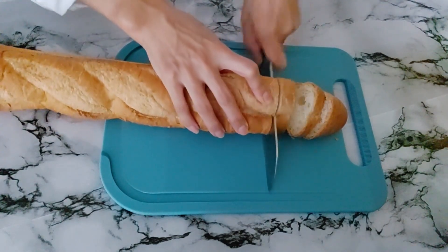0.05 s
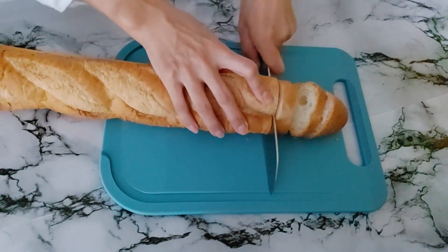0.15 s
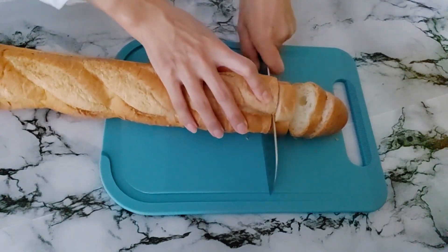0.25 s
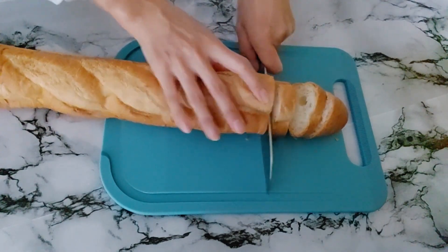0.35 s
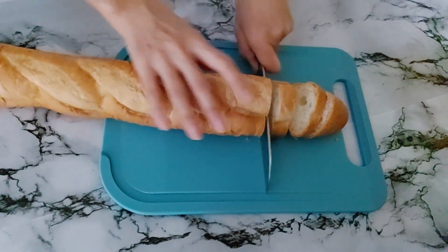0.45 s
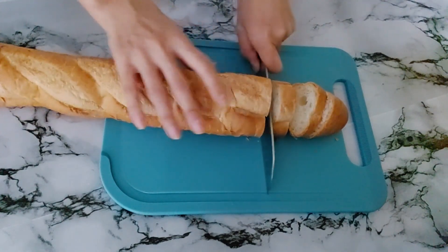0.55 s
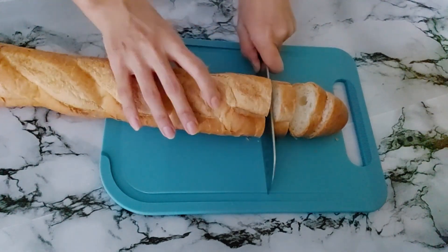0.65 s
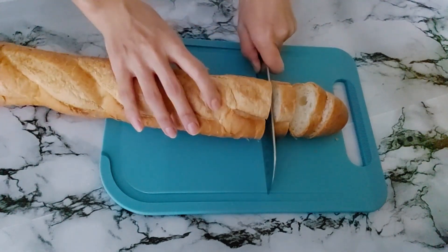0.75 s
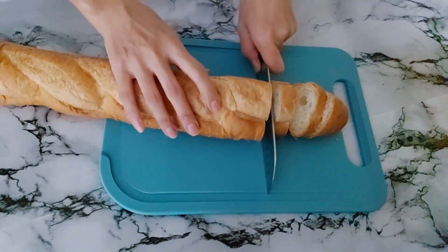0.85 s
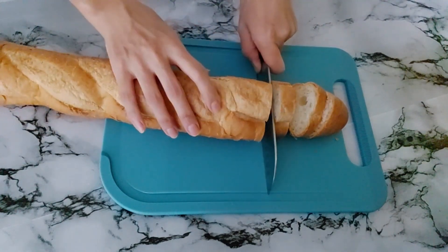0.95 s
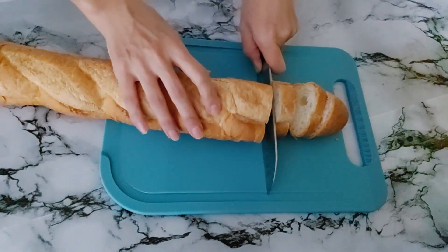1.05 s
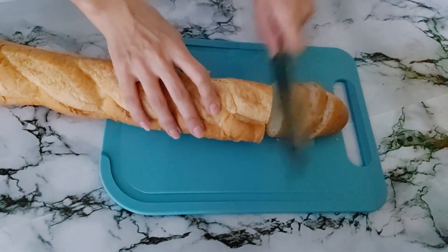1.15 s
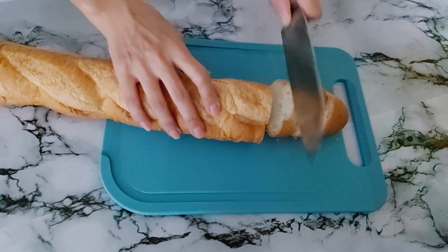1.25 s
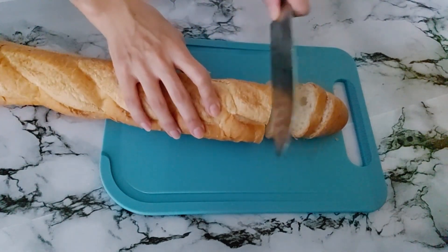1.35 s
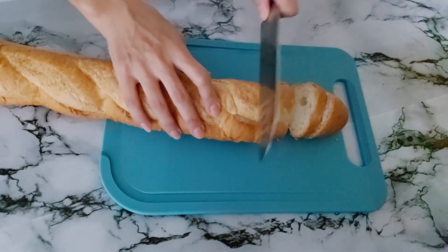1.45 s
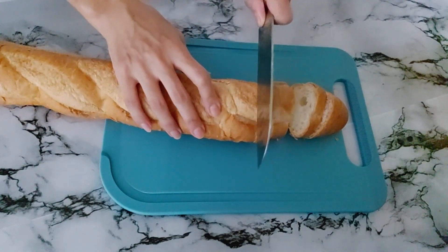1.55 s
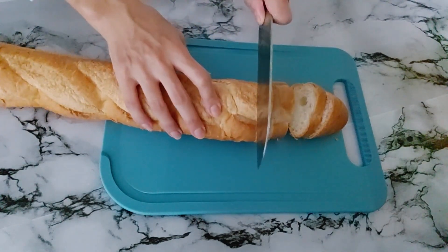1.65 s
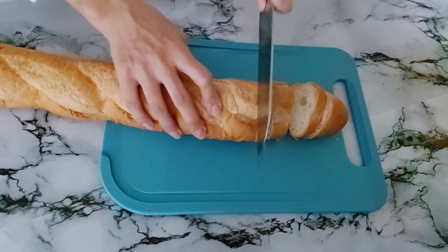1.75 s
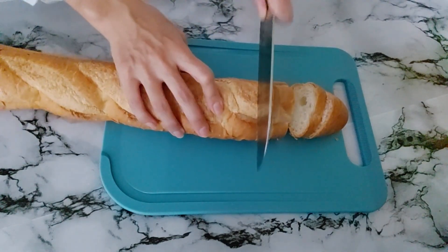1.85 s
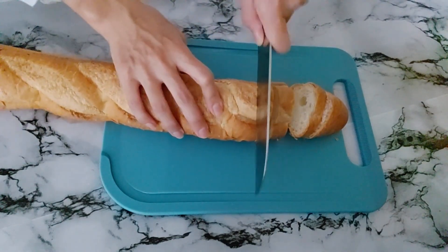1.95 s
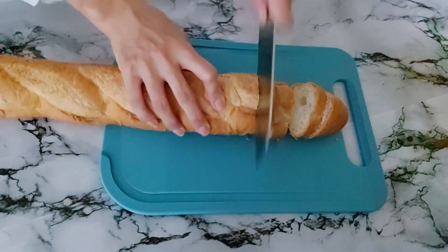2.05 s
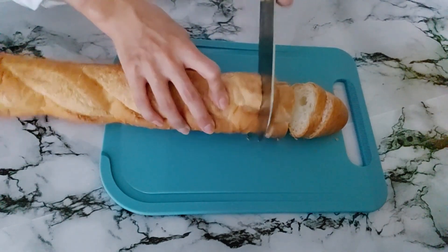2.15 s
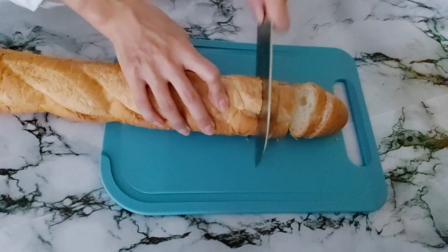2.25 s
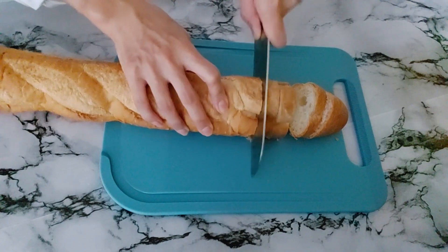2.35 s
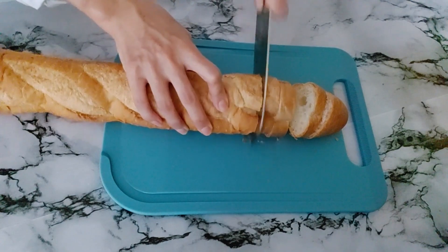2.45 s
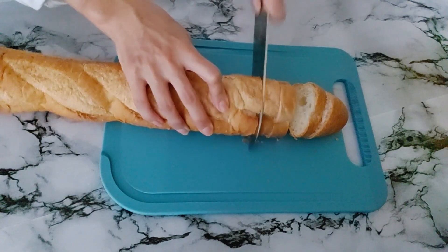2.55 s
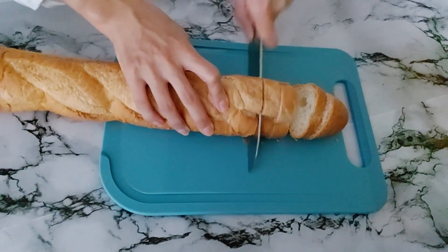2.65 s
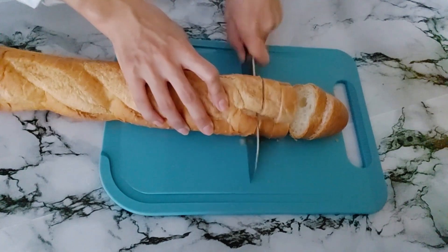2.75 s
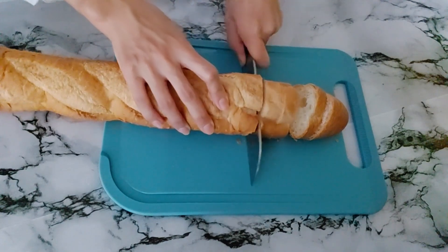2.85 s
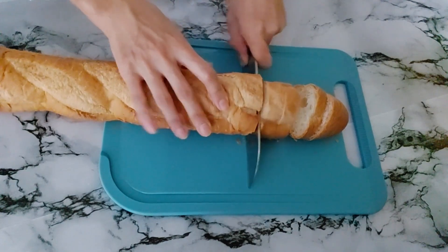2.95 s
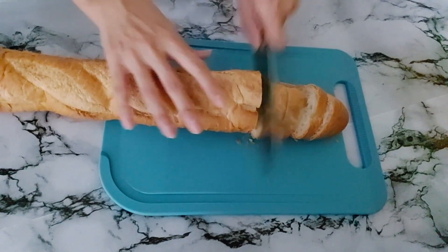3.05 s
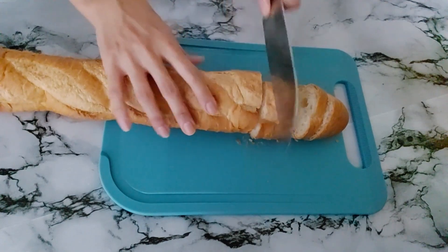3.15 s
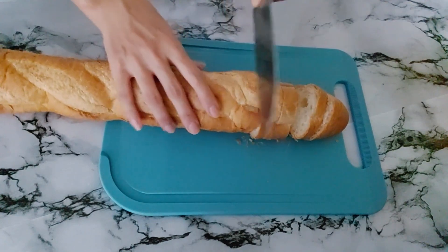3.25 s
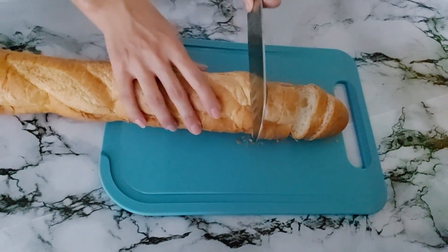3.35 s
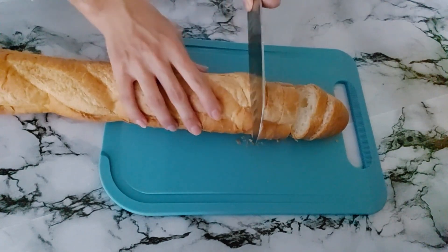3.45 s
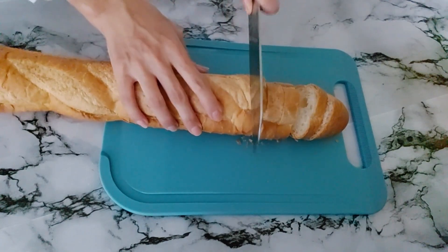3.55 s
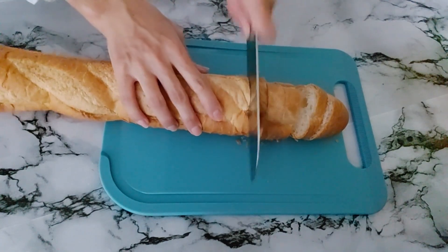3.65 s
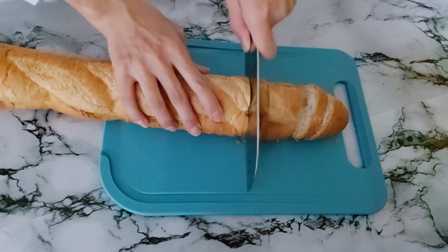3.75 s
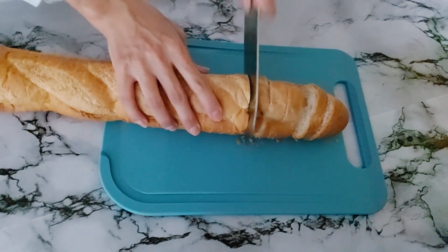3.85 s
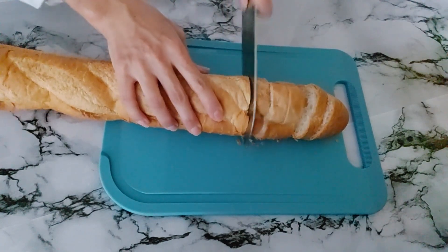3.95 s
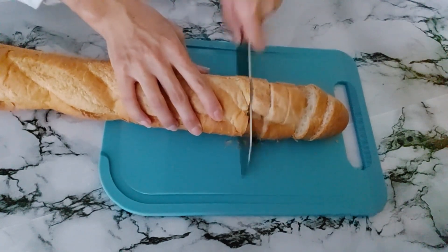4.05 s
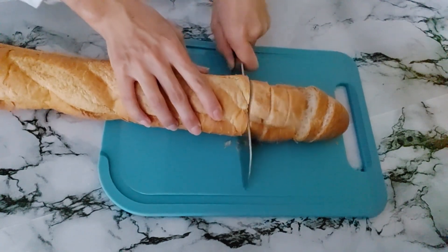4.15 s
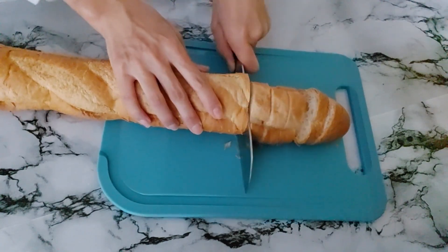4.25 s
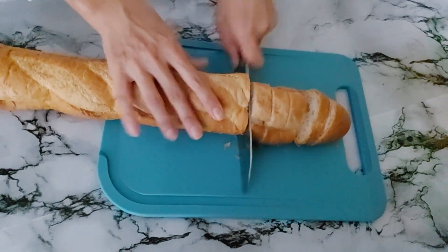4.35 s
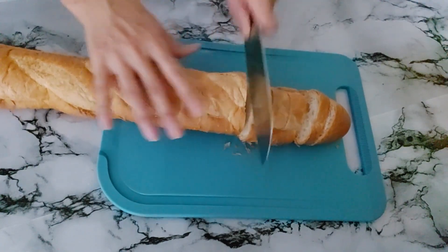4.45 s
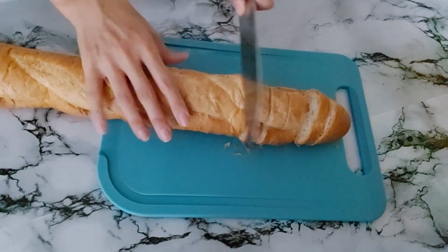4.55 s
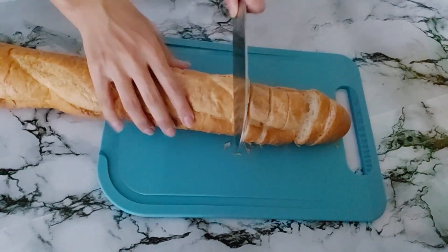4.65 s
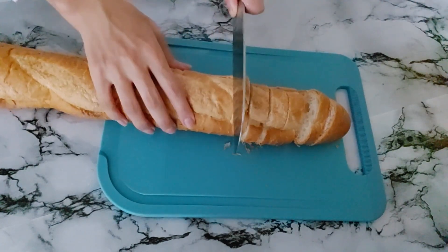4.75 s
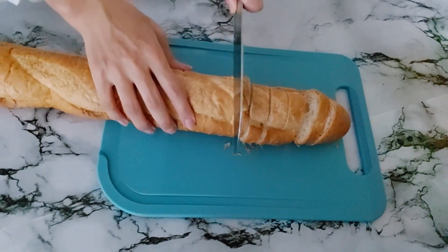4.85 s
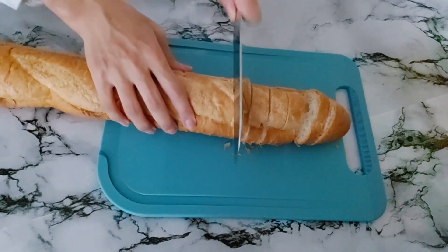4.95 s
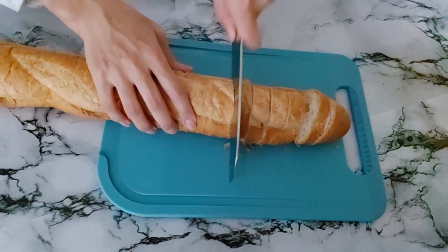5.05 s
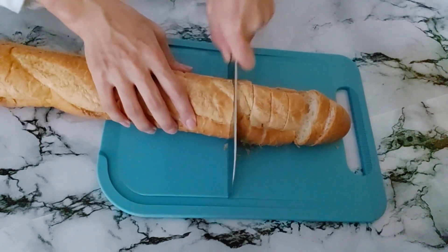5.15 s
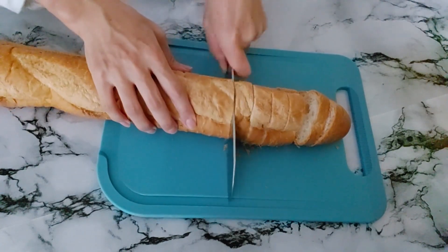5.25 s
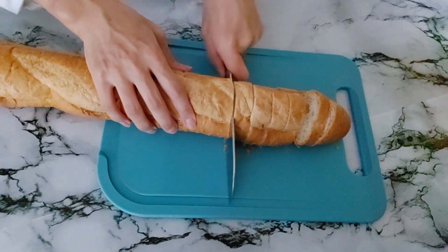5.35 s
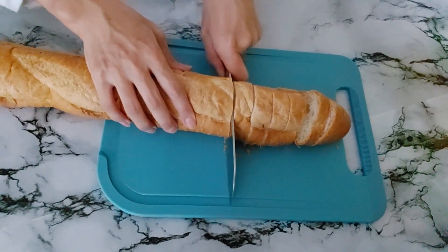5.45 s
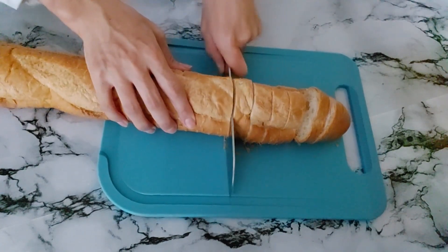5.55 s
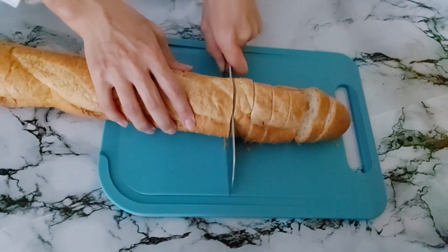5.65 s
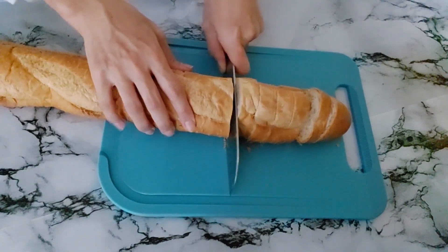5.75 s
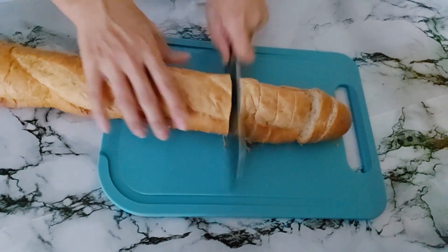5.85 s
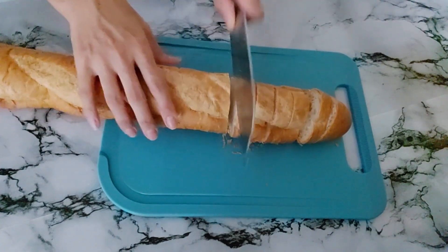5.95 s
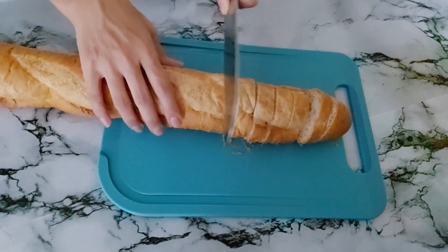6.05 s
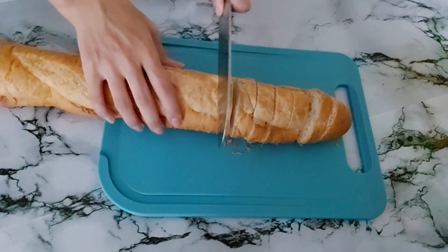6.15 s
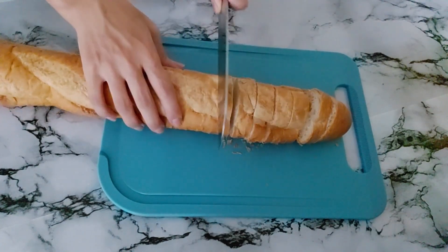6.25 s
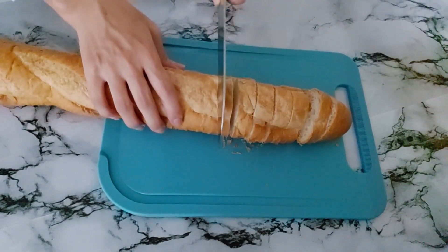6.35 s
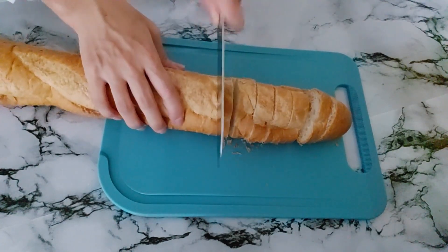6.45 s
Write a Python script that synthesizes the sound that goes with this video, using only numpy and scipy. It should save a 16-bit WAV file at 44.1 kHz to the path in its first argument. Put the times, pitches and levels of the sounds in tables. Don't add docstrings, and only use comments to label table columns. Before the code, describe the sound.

A knife saws crisp slices off a stale baguette on a plastic board, with crackling crust, sharp hollow snaps and low counter thumps in a quiet kitchen.

```python
import sys
import numpy as np
from scipy import signal
from scipy.io import wavfile
from scipy.ndimage import uniform_filter1d

SR = 44100
rng = np.random.default_rng(int(sys.argv[2]) if len(sys.argv) > 2 else 0)


def gain_from_decibels(decibels):
    exponent = np.asarray(decibels, float) / 20
    return 10 ** exponent


def unload_wav(signal):
    wavfile.write(
        sys.argv[1],
        SR,
        np.round(np.clip(np.atleast_2d(signal).T, -1, 1) * 32767).astype(np.int16),
    )


N = 287091

# frequency in Hz, level in dB per Hz.
AIR = [(18, -52), (30, -27.5), (75, -18), (88, -9), (140, -2), (169, -9), (250, -2.5), (333, -32),
       (370, -8), (1370, -31.5), (2190, -27), (5050, -52.5), (5470, -29.5), (15600, -35)]
AIR_DB = -67.5
# frequency in Hz, likeness from -1 to 1.
PORT_LIKENESS = [(60, 0.7), (240, 0.25), (950, 0.2), (3770, -0.3), (15000, -0.048)]
# frequency in Hz, width in Hz, level in dB.
FAN_HUM = [(101, 14, -78.5), (208, 16, -81.5), (259, 24, -73.5), (5370, 45, -100)]
# frequency in Hz, t60 in seconds.
KITCHEN_DECAY = [(200, 0.13), (1000, 0.042), (4000, 0.077), (12000, 0.13)]
KITCHEN_DB = -6.5

# start in seconds, length in seconds, pitch in Hz, level in dB.
SINGING = [
    (1.22, 0.098, 10300, -91.5),
    (2.929, 0.23, 2820, -73.5),
    (3.369, 0.056, 4400, -95),
    (4.491, 0.1, 4800, -79),
    (5.824, 0.11, 3350, -76.5),
    (5.936, 0.077, 3990, -71.5),
    (5.461, 0.014, 3350, -52),
    (5.924, 0.051, 6980, -72),
    (5.928, 0.083, 10300, -77),
    (6.355, 0.15, 3450, -76.5),
]
# start in seconds, level in dB, pitch in Hz, t60 in seconds.
THUMPS = [(0.184, -33.5, 82, 0.16), (1.652, -51.5, 61.6, 0.13), (2.685, -44, 61.7, 0.14),
          (2.847, -42, 61, 0.4), (3.454, -52.5, 59.6, 0.17), (3.729, -41, 63.6, 0.23),
          (4.105, -38, 63.4, .2), (5.129, -35, 63, 0.19), (4.239, -26.5, 59.7, 0.27),
          (4.522, -53.5, 130, 0.28), (4.525, -52.5, 55.4, .25), (4.77, -49.5, 79, 0.149),
          (5.48, -31.5, 66, 0.2), (5.968, -47, 61.5, 0.35), (5.999, -36, 144, 0.1),
          (6.259, -50.5, 59.21, 0.2)]

# frequency in Hz, level in dB, t60 in seconds.
LOAF_MODES = [(530.8, 12.5, 0.083), (705, -1, 0.26), (780, 0.5, 0.15), (934, 14, 0.061), (1100, -11, 0.02),
              (1533, -5.5, 0.0092), (1733, 10, 0.079), (1880, -18, 0.054), (1960, -3.5, 0.01),
              (2200, -17.5, 0.039), (2540, -12, 0.04), (2880, -15.5, .04), (3400, -22, 0.043)]
# frequency in Hz, level in dB, t60 in seconds.
BOARD_MODES = [(130, -9.5, 0.19), (220, -12, 0.035), (239.8, 2.5, 0.14), (259.5, -1.5, 0.13)]
# start in seconds, peak in dB, crack pitch in Hz,
# board knock in dB, bright tick in dB.
CRACKS = [(0.0, -31, 700, -35.5, -62), (1.23, -81, 3020, -85, -59), (1.468, -84, 3000, -85.5, -62),
          (5.949, -72, 3300, -69, -58), (0.1734, -20.5, 900, -53.5, -53.5), (1.7673, -57, 780, -79, -61.5),
          (2.031, -35.5, 1250, -69, -67.5), (2.304, -41, 1000, -47, -53.5), (2.666, -7, 977, -28, -51.5),
          (3.437, -54, 786, -58.5, -64), (3.713, -27.5, 860, -37.5, -44), (4.039, -60, 1100, -72, -53),
          (4.091, -3.5, 1530, -27.5, -54), (4.2259, -9, 931, -39.5, -46), (4.382, -59, 515, -61, -51),
          (4.48, -62, 3020, -68, -41), (5.013, -47, 560, -49.5, -51), (5.19, -15.5, 1600, -32.5, -66.5),
          (5.391, -18, 607, -40.5, -33.5), (5.825, -67.5, 3360, -65.5, -49.5),
          (5.933, -75, 3290, -82, -61.5), (6.083, -46.5, 500, -49.5, -59)]
# start in seconds, peak in dB, pitch in Hz,
# board knock in dB, hollow note in dB.
TAPS = [(1.164, -63, 780, -54.5, 13.5), (1.6308, -47.5, 920, -60, -23), (2.84, -26.5, 705, -44.5, -13),
        (3.107, -53.5, 1435, -68, 2.5), (3.259, -61, 786, -86, -7.5), (4.402, -44, 720, -52.5, -5),
        (4.412, -46, 780, -59, -22), (4.435, -43.5, 768, -70, -2), (4.6481, -49, 600, -55.5, -21),
        (4.7533, -45, 680, -49.5, -17.5), (5.468, -16.5, 950, -37.5, -38), (4.521, -59, 420, -52, -20),
        (5.568, -48, 743, -70, -22), (5.888, -56.5, 793, -66.5, 3), (5.967, -49, 750, -43.5, -3),
        (5.985, -45.5, 553, -48.5, -9.5), (6.242, -60.5, 531, -59, -8.5)]
CRACK_NOTE_DB, TAP_TICK_DB, TAP_TICK_SHARE = -23, -70, 0.1
CRACK_SLIDE_HZ, TAP_SLIDE_HZ = 2800, 490
PORT_LAG = 5
BLADE_LAGS = (1, 3, 5, 9)

# start in seconds, hold in seconds, pressure in dB,
# pressure drift over the hold in dB, blade speed in dB.
STROKES = [(1.93, .1, -58.5, 8, -9), (2.13, 0.06, -52, 1.1, -3.5), (2.3, 0.096, -42, 0, -7.5),
           (2.5, 0.054, -54.5, -3.5, 7), (3.88, 0.065, -47.5, -2, -4.5), (5.065, 0.12, -40, 5, -16.5),
           (5.17, .1, -36.5, -1.5, -11.5), (5.4, 0.0072, -45.5, -6, -4), (5.463, 0.043, -39.5, -9, -23),
           (5.6, 0.036, -56.5, -1, -11.5), (6.46, .05, -69, 17, -9)]
# start in seconds, hold in seconds, pressure in dB,
# drift in dB, speed in dB.
RUBS = [(0.25, .06, -68, -11.5, -8.5), (0.36, .04, -88, -8, -3), (0.42, 0.049, -68, -5.5, -17.5),
        (1.46, 0.023, -86, -8, -4), (2.92, 0.16, -69.5, 5, -10), (3.2, 0.16, -84.5, 7, -18),
        (3.64, 0.12, -68, 15, -11.5), (4.0, 0.018, -64.5, -4, -5.5), (2.24, .03, -50, 0, -23.5),
        (2.46, 0.015, -56.5, 3.5, -13), (4.39, 0.023, -63, 5.5, -13.5), (4.53, 0.036, -68.5, -12, -9),
        (5.77, 0.14, -82.5, 8, -2.5), (5.94, 0.061, -75, -3, -1.3), (6.33, 0.061, -77, -0.5, -19)]
# start in seconds, hold in seconds,
# pressure in dB, drift in dB, speed in dB.
BITES = [(1.168, 0.022, -66, -0.5, -14), (1.633, .02, -65, 4, -20.5), (1.77, .065, -65, 1.5, -6),
         (3.44, .03, -78, 3.5, -13.5), (3.716, 0.1, -37, -3.5, -15), (4.385, .01, -70, -2.5, -1),
         (4.484, 0.014, -69, -1, 6.5), (4.652, .02, -61, -4, -26), (4.756, 0.033, -60, -1.5, -26),
         (5.014, .03, -66, -1, -18.5), (5.826, .012, -83.5, 0, 7.5), (5.95, 0.014, -74, 0, 6),
         (6.086, 0.037, -55, -6.5, -33), (6.244, 0.0142, -73, -3.5, -14)]
# start in seconds, hold in seconds,
# pressure in dB, drift in dB, speed in dB.
FINISHES = [
    (0.0, .17, -43.5, 0, -6.5),
    (2.66, 0.17, -35, -11.5, -6.5),
    (4.075, .03, -32, -1.5, -10.5),
    (4.12, 0.12, -38.5, -3.5, -9.5),
    (4.27, .07, -51, -13.5, -16),
    (5.29, 0.088, -43, -9.5, -12),
]
STROKE_RISE, STROKE_FALL, STROKE_CRISP_DB = 380, 276, 0.5
RUB_RISE, RUB_FALL, RUB_CRISP_DB = 240, 92, -3
BITE_RISE, BITE_FALL, BITE_CRISP_DB = 1600, 610, 0
FINISH_RISE, FINISH_FALL, FINISH_CRISP_DB = 477, 340, 4.5
RASP_DRIFT, RASP_EDGE = 0.87, 0.98
REST_DB = [
    [-99],
    [-108],
]

# frequency in Hz, level in dB per Hz.
CRUST = [(150, -35), (300, -4.5), (500, 1), (1000, -1.5), (1700, -3.5), (2300, -4.5), (3300, -8.5),
         (4500, -20), (8000, -33), (16000, -56.5)]
# frequency in Hz, level in dB per Hz.
RASP = [(1500, -20), (3000, -3.5), (4500, -2), (6000, -4.5), (8000, -8), (10000, -9), (12500, -3),
        (15500, -11)]
CRISP_SHARE, CRISP_DB = 0.87, 8
PATCH_DB = 2.2
BOARD_SHARE, BOARD_DB = 0.61, -26
COUNTER_SHARE, COUNTER_DB, COUNTER_LATE_S = 0.82, -22.5, 0.06
RASP_REST_DB, COUNTER_REST_DB, COUNTER_TOP_DB = -91, -80, -50


def evened(x):
    return x / np.sqrt(np.mean(x ** 2) + 1e-20)


def read(points, hz):
    f, value = np.transpose(points)
    return np.interp(np.log(hz + 1), np.log(f + 1), value)


def add(mix, start_s, sound):
    part = mix[..., round(start_s * SR):][..., :sound.shape[-1]]
    part += sound[..., :part.shape[-1]]


def coloured(x, points):
    shape_db = np.maximum(read(points, abs(np.fft.fftfreq(4096, 1 / SR))), -100)
    log_gain = np.log(gain_from_decibels(shape_db))
    taps = np.fft.ifft(np.exp(np.conj(signal.hilbert(log_gain)))).real[:2048]
    return signal.oaconvolve(np.atleast_2d(x), taps[None], axes=1)[:, :x.shape[-1]]


def band(x, lo_hz, hi_hz):
    return signal.sosfilt(signal.butter(2, [lo_hz, hi_hz], "band", fs=SR, output="sos"), x)


def highpass(x, order, hz):
    return signal.sosfilt(signal.butter(order, hz, "high", fs=SR, output="sos"), x)


def band_rms(x, lo_hz, hi_hz):
    return x / np.std(band(x, lo_hz, hi_hz))


def whistle(hz, width_hz, count):
    r = np.exp(-np.pi * width_hz / SR)
    noise = [1, 1j] @ rng.standard_normal((2, count + 4000))
    slow = signal.lfilter([1], [1, -2 * r, r * r], noise)[4000:]
    return evened((slow * np.exp(2j * np.pi * hz * np.arange(count) / SR)).real)


def ring(modes, signs, damping=0.92, rise_s=0.00027):
    t = np.arange(SR // 6) / SR
    tones = 0
    for (hz, db, t60), sign in zip(modes, signs):
        tones = tones + sign * gain_from_decibels(db - 60 * damping * t / t60) * np.sin(2 * np.pi * hz * t)
    return tones * (1 - np.exp(-t / rise_s)) ** 2


def air():
    hz = np.fft.rfftfreq(2048, 1 / SR)
    a, b, c, d, patches = rng.standard_normal((N // 512 + 5, 1025, 5)).T
    patches = evened(uniform_filter1d(uniform_filter1d(patches, 12, 0), 8, 1))
    same = np.clip(read(PORT_LIKENESS, hz), -1, 1)[:, None]
    left = a + 1j * b
    right = same * left + np.sqrt(1 - same ** 2) * (c + 1j * d)
    z = np.array([left, right]) * gain_from_decibels(read(AIR, hz)[:, None] + 0.69 * patches)
    tone = signal.istft(z, nperseg=2048, noverlap=1536)[1][:, :N]
    hum = sum(gain_from_decibels(db) * whistle(f, width, N) for f, width, db in FAN_HUM)
    return gain_from_decibels(AIR_DB - 4.5) * evened(tone) + hum


def kitchen(x):
    taps = np.zeros((2, SR // 2))
    at = np.arange(60, SR // 2 - 20, 20)
    at = at + rng.integers(0, 20, (2, len(at)))
    np.put_along_axis(taps, at, rng.choice([-1., 1.], at.shape), 1)
    hz, t, z = signal.stft(taps, SR, nperseg=256)
    decay = gain_from_decibels(-60 * t / read(KITCHEN_DECAY, hz)[:, None])
    tail = signal.istft(z * decay, SR, nperseg=256)[1]
    return signal.fftconvolve(x[None], tail / np.linalg.norm(tail[0]), axes=1)[:, :N]


def add_singing(mix):
    for start_s, length_s, hz, db in SINGING:
        count = round(length_s * SR)
        add(mix, start_s, gain_from_decibels(db) * whistle(hz, 250, count) * signal.windows.tukey(count, 0.6))


def add_thumps(mix):
    t = np.arange(SR // 3) / SR
    for start_s, db, hz, t60 in THUMPS:
        tone = np.sin(2 * np.pi * hz * t) * (1 - np.exp(-t / 0.002))
        add(mix, start_s, gain_from_decibels(db - 60 * t / t60) * tone)


def snap(peak_db, hz, knock_db, tick_db, note_db, top_hz, chance):
    t = np.arange(SR // 6) / SR
    hard = np.clip((peak_db + 51) / 30, 0.1, 1)
    slide_hz = top_hz * hard
    turns = min(hz, 950) * t + slide_hz * 0.00053 * (1 - np.exp(-t / 0.00057))
    crack = -np.sin(2 * np.pi * turns) * np.exp(-t / 0.0009) * (1 - np.exp(-t / 0.00004)) ** 2
    crack = crack + 0.3 * np.roll(crack, round(0.0009 * SR))
    splinters = np.sin(2 * np.pi * 4300 * t) * np.exp(-t / 0.0005)
    crack = crack - 0.45 * top_hz / CRACK_SLIDE_HZ * splinters
    crack = crack / abs(crack).max()

    crumble = evened(band(band(rng.standard_normal(len(t)), 0.26 * hz, 3.5 * hz), 300, 4000))
    crumble = (0.17 - 0.09 * hard) * crumble * np.exp(-t / 0.011) * (1 - np.exp(-t / 0.002))
    note = np.sin(2 * np.pi * hz * t) * np.exp(-t / 0.014) * (1 - np.exp(-t / 0.00033))
    near = [(f, db - 5 * abs(np.log2(f / hz)), t60) for f, db, t60 in LOAF_MODES]
    body = crack + gain_from_decibels(note_db) * note * (hz < 1200) + crumble
    body = body + 0.16 * ring(near, chance[:len(LOAF_MODES)], damping=1.7, rise_s=0.0006)
    body = body + 0.1 * np.roll(body, round(0.0056 * SR))

    knock = ring(BOARD_MODES, chance[-4:] * 0.33 + 1, rise_s=0.0053)
    tick = band(rng.standard_normal((2, len(t))), 2700, 13000)
    tick = tick * (np.exp(-t / 0.0022) + 0.12 * np.exp(-t / 0.02))
    pair = gain_from_decibels(peak_db + np.array([[1.5], [-1.5]])) * body + gain_from_decibels(knock_db + 3) * knock
    pair[1] = np.roll(pair[1], PORT_LAG)
    return pair + gain_from_decibels(tick_db - 4.5) * tick


def add_blows(mix):
    blows = [(*row, CRACK_NOTE_DB, CRACK_SLIDE_HZ) for row in CRACKS]
    for start_s, db, hz, knock_db, note_db in TAPS:
        tick_db = TAP_TICK_DB + TAP_TICK_SHARE * db
        blows.append((start_s, db, hz, knock_db, tick_db, note_db, TAP_SLIDE_HZ))
    chance = rng.uniform(-0.69, 1, (len(blows), len(LOAF_MODES) + 4))
    for (start_s, *blow), row in zip(blows, chance):
        add(mix, start_s + 0.0009, snap(*blow, row))


def grit(per_s, spread_db, clump_db):
    sizes = gain_from_decibels(spread_db * np.minimum(rng.exponential(1, N), 3.2)) * rng.choice([-1., 1.], N)
    clumps = evened(uniform_filter1d(uniform_filter1d(rng.standard_normal(N), 300), 300))
    left = sizes * (rng.random(N) < per_s / SR) * gain_from_decibels(clump_db * clumps)
    place = rng.integers(0, len(BLADE_LAGS), N)
    right = sum(np.roll(left * (place == k), lag) for k, lag in enumerate(BLADE_LAGS))
    return evened(np.array([left, right]))


def patchy(x, depth_db):
    z = signal.stft(x, nperseg=256)[2]
    field = uniform_filter1d(uniform_filter1d(rng.standard_normal(z.shape[1:]), 4, 0), 9, 1)
    return signal.istft(z * gain_from_decibels(depth_db * evened(field)), nperseg=256)[1][:, :N]


def effort():
    t = np.arange(0, N + 64, 64) / SR
    power = gain_from_decibels(2 * np.array(REST_DB + REST_DB[:1]))
    moves = ((STROKES, STROKE_RISE, STROKE_FALL, STROKE_CRISP_DB),
             (RUBS, RUB_RISE, RUB_FALL, RUB_CRISP_DB),
             (BITES, BITE_RISE, BITE_FALL, BITE_CRISP_DB),
             (FINISHES, FINISH_RISE, FINISH_FALL, FINISH_CRISP_DB))
    for rows, rise, fall, crisp_db in moves:
        for start, hold, pressure_db, drift_db, speed_db in rows:
            drift = drift_db * np.clip((t - start) / max(hold, 0.004), 0, 1)
            edge = -rise * np.maximum(start - t, 0) - fall * np.maximum(t - start - hold, 0)
            rasp_db = RASP_EDGE * edge + speed_db + RASP_DRIFT * drift
            curves = np.array([edge + drift, rasp_db, edge + drift + crisp_db])
            power = power + gain_from_decibels(2 * (pressure_db + curves))
    pressure_db, rasp_db, dry_db = (np.interp(np.arange(N) / SR, t, 10 * np.log10(p)) for p in power)
    return pressure_db, rasp_db, dry_db - pressure_db


def crunch_of_crust(crunch_db, crisp_db):
    breaks = grit(2500, 2.0, 1.0)
    blow = ring(LOAF_MODES, rng.choice([-1, 1], len(LOAF_MODES)), damping=4.3)
    loaf = signal.oaconvolve(grit(900, 3.3, 1.8), blow[None], axes=1)[:, :N]
    crunch = band_rms(evened(coloured(breaks, CRUST)) + 0.37 * evened(loaf), 490, 4300)
    crunch = patchy(crunch, PATCH_DB)
    upper = signal.sosfiltfilt(signal.butter(2, 1150, "high", fs=SR, output="sos"), crunch)
    return (crunch - upper + upper * gain_from_decibels(crisp_db)) * gain_from_decibels(crunch_db)


def shaking(crunch_db):
    board_db = BOARD_SHARE * crunch_db + BOARD_DB
    n = np.arange(N)
    counter_db = np.interp(n - COUNTER_LATE_S * SR, n, COUNTER_SHARE * crunch_db + COUNTER_DB)
    counter_db = np.clip(counter_db, COUNTER_REST_DB, COUNTER_TOP_DB)
    board = signal.oaconvolve(rng.standard_normal(N), ring(BOARD_MODES, np.ones(4), damping=6.7))[:N]
    rumble = rng.standard_normal(N) + 0.077 * rng.standard_normal((2, N))
    counter = band(band(rumble, 45, 160), 45, 160)
    return evened(board) * gain_from_decibels(board_db) + evened(counter) * gain_from_decibels(counter_db)


def strokes():
    crunch_db, rasp_db, dry_db = effort()
    crisp_db = np.minimum(CRISP_SHARE * (rasp_db - crunch_db) + CRISP_DB + dry_db, 14)
    crunch = crunch_of_crust(crunch_db, crisp_db)
    rasp = band_rms(coloured(grit(14000, 0.72, 1.5), RASP), 6000, 12000)
    rasp = rasp * np.hypot(gain_from_decibels(rasp_db), gain_from_decibels(RASP_REST_DB))
    return crunch + rasp, shaking(crunch_db)


def scene():
    saw, low = strokes()
    add_singing(saw)
    add_thumps(low)
    pair = saw * gain_from_decibels(np.array([[0.4], [-0.4]])) + low * gain_from_decibels(np.array([[0.7], [-0.7]]))
    add_blows(pair)
    return pair + gain_from_decibels(KITCHEN_DB) * kitchen(band(pair.mean(0), 120, 16000)) + air()


def low_pass(x):
    return signal.sosfilt(signal.butter(12, 15710, fs=SR, output="sos"), x)


def record(dry):
    dry = highpass(dry, 4, 40)
    edge = signal.firwin(511, 15780, window=("kaiser", 9), fs=SR)
    mix = signal.oaconvolve(dry, edge[None], "same")
    return low_pass(mix)


dry = scene()
out = record(dry)
unload_wav(out)
```